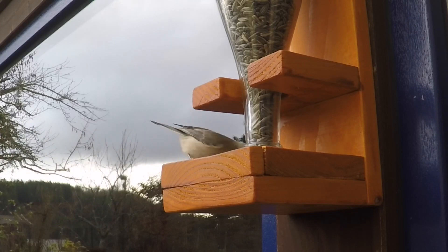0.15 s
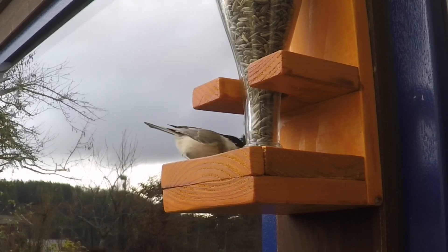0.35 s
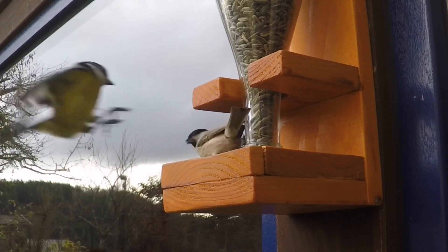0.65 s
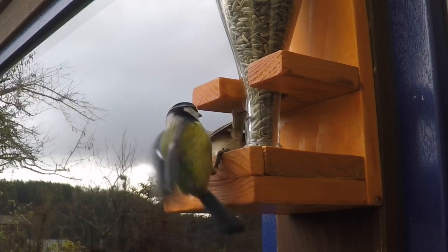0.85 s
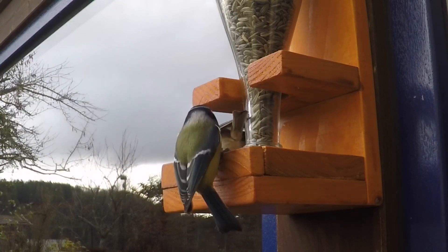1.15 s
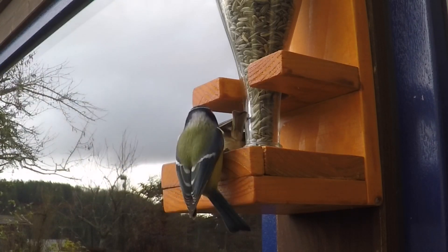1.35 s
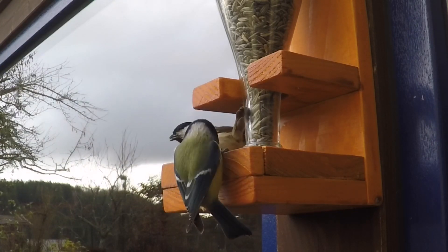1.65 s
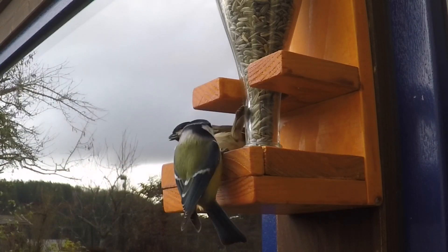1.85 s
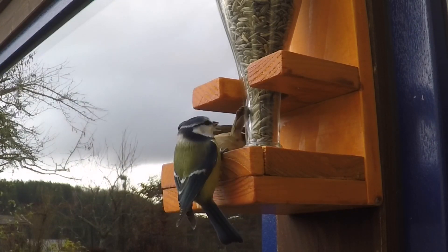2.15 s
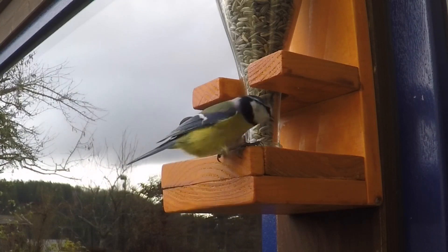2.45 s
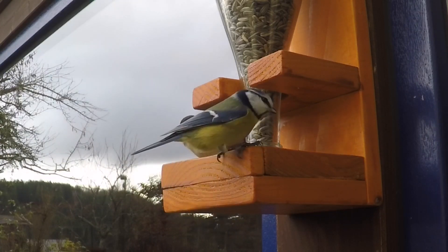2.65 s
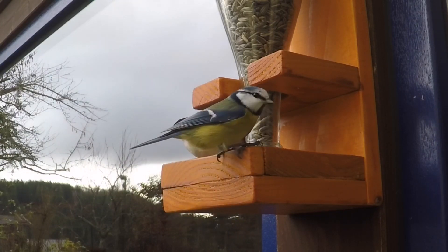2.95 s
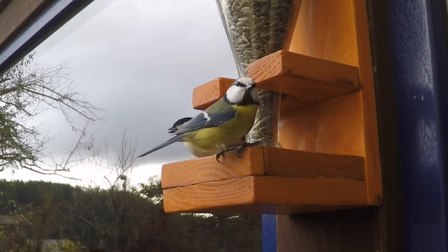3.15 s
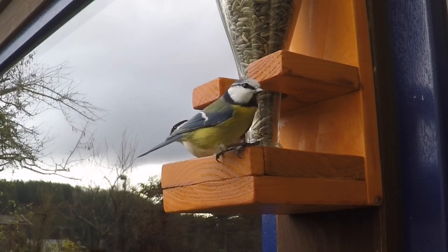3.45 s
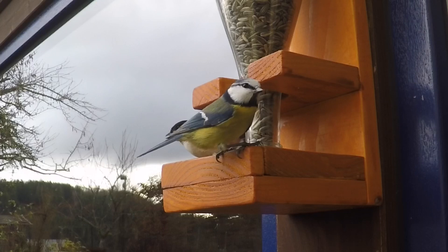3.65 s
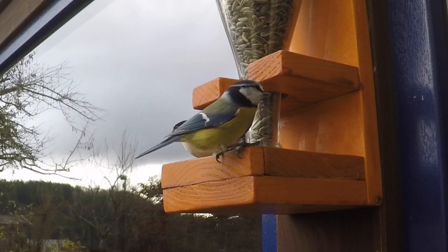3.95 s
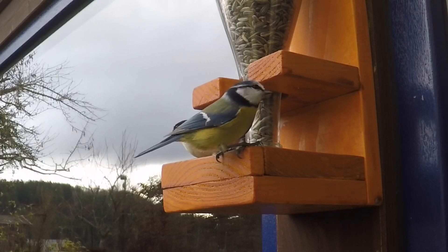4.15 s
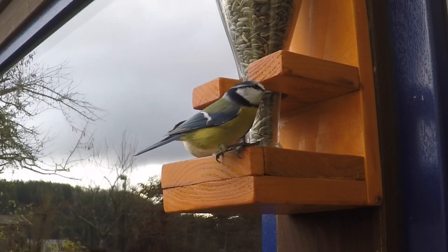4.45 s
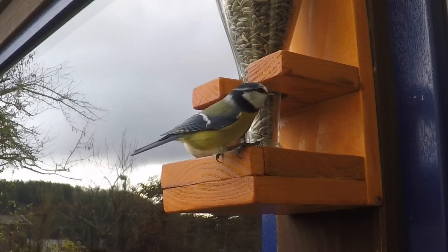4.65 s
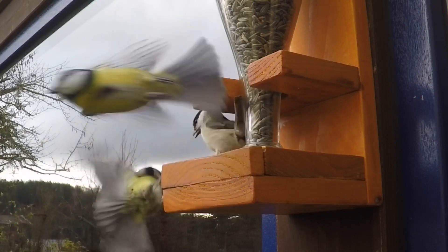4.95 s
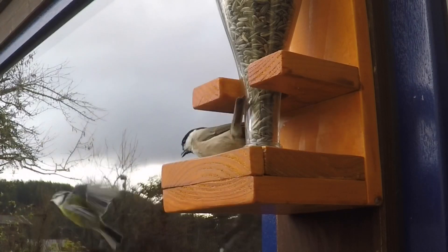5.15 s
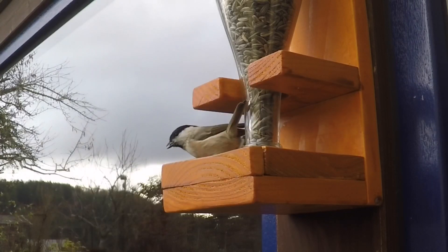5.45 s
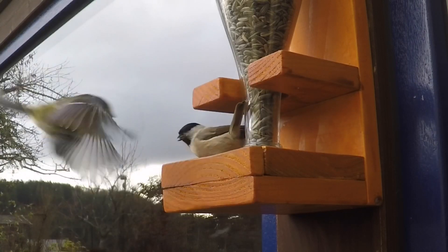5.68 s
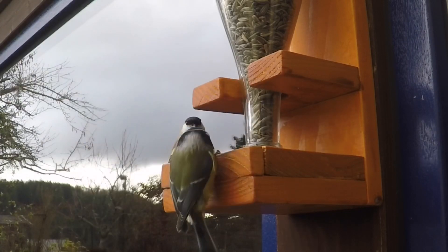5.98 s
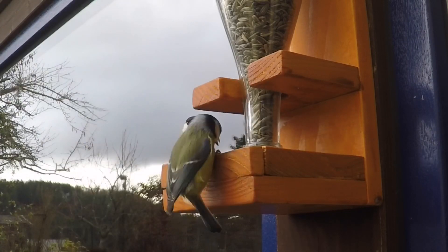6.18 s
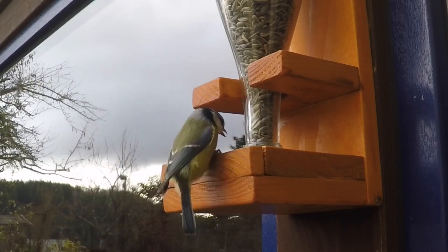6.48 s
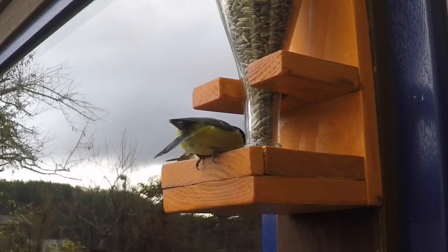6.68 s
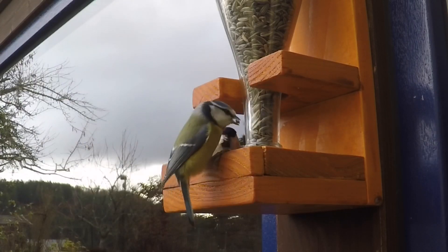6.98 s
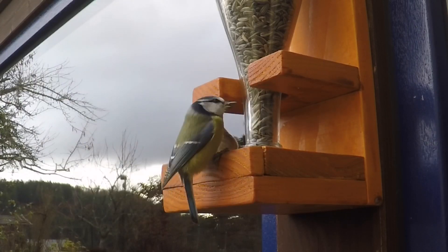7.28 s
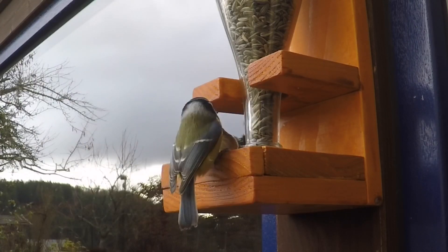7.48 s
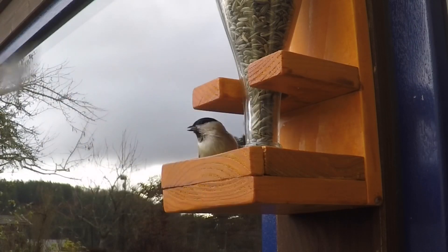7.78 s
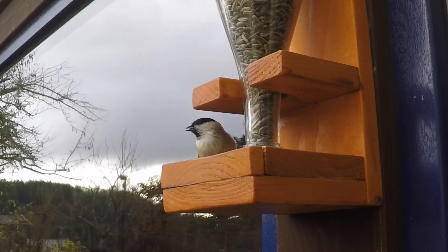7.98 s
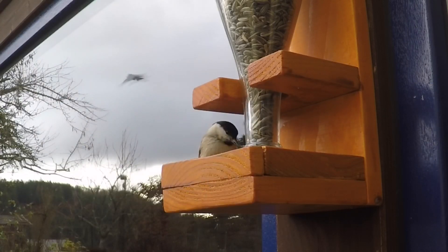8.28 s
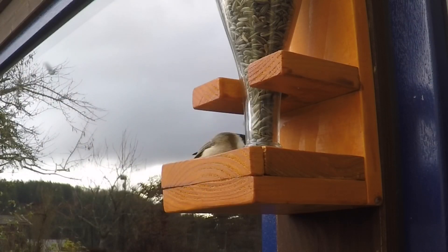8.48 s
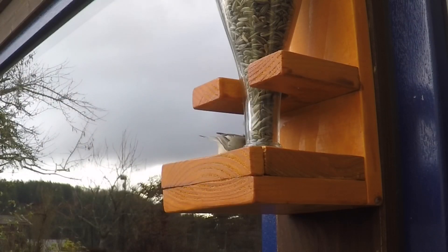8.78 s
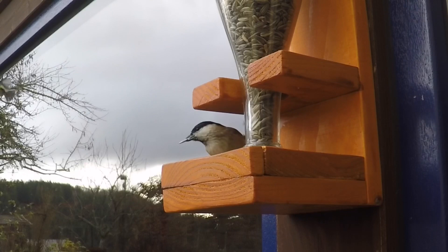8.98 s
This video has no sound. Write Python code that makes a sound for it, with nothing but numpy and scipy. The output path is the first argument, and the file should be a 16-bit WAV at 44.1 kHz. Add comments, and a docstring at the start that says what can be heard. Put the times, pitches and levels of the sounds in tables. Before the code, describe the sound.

Tiny birds bicker beside the microphone at a window feeder. Their very high, clipped notes arrive in three main clusters, each including a whistle and a rapid chip sliding into a rough warble, with light echoes from wall and wood. Between them are tiny ticks, claws and beaks scraping husks, and soft low wing flutters. Birds whirr past twice. A steady, quiet outdoor rush, low rumble and thin hiss remain after the calls stop.

```python
"""At a wooden window feeder, tits squabble in thin whistles, sharp ticks and quick down-swept chatter.
Each note is a frequency-modulated tone with weak overtones, heard directly and by reflection from wall and feeder.
Shaped noise bursts give the whirring wings and the claws and beaks that scratch among the seeds.
Steady coloured noise gives a distant outdoor rush and faint hiss; low noise puffs are air on the microphone."""
import sys
import numpy as np
from scipy import signal
from scipy.fft import rfft, irfft, next_fast_len
from scipy.io import wavfile
from scipy.ndimage import uniform_filter1d

SR = 44100
rng = np.random.default_rng(int(sys.argv[2]) if len(sys.argv) > 2 else 0)


def to_wav(s):
    """Save 16-bit WAV."""
    ch = np.atleast_2d(s).T  # columns
    pcm = np.round(np.clip(ch, -1, 1) * 32767)  # PCM
    wavfile.write(sys.argv[1], SR, pcm.astype(np.int16))


N = 402191  # length in samples
TOP_HZ = 15200  # band limit of the notes and of the whole mix


def amp(db):
    """Level to amplitude: 20 dB is a factor of ten."""
    return 10 ** (np.asarray(db) / 20)


def unit(x):
    """Normalisation: scale to rms 1."""
    return x / np.sqrt(np.mean(x ** 2) + 1e-20)


def along(points, hz):
    """Logarithmic frequency scale: interpolate (f/Hz, value) points along it."""
    f, values = np.transpose(points)
    return np.interp(np.log(hz + 1), np.log(f + 1), values)


def filtered(x, response):
    """Linear filtering: multiply the spectrum of x by a function of frequency."""
    n = x.shape[-1]
    padded = next_fast_len(n + 8192)
    spectrum = rfft(x, padded) * response(np.fft.rfftfreq(padded, 1 / SR))
    return irfft(spectrum, padded)[..., :n]


def panned(x, balance):
    """Interchannel level difference: half raises the left, half lowers the right, by frequency."""
    return filtered(x, lambda hz: amp(np.outer([.5, -.5], along(balance, hz))))


def add(track, s, sound):
    """Superposition: sum a sound into the track from time s, in seconds."""
    start = max(round(s * SR), 0)
    part = track[..., start:start + sound.shape[-1]]
    part += sound[..., :part.shape[-1]]


def wobble(count, size):
    """Random modulation: a moving average of noise over size samples, with rms 1."""
    return unit(uniform_filter1d(rng.standard_normal(count), size=size))


def spread(pair, spectrum, width):
    """Mid-side stereo: two signals are coloured, then summed into left and differenced into right."""
    def colour(hz):
        side_gain = amp(along(width, hz))
        shares = np.array([np.ones_like(hz), side_gain]) / np.hypot(1, side_gain)
        return amp(along(spectrum, hz)) * shares
    mid, side = filtered(pair, colour)
    return np.array([mid + side, mid - side])


# Stereo width of all noise: f/Hz, side-to-mid level/dB
NOISE_WIDTH = [(60, 0.5), (110, -9.5), (200, 2.5), (380, 1), (700, 8), (1290, 5), (2380, 1.5), (4400, -5.5),
               (8120, 1.5), (15000, 0)]
# Stereo balance of all noise: f/Hz, left-to-right level/dB
NOISE_BALANCE = [(50, -5.5), (150, -2), (280, 0), (800, 0), (6800, 0), (7800, -7), (9000, -3.5),
                 (11000, -0.5)]


def noise(spectrum, drive=1):
    """Shaped noise: white noise is modulated by drive, then coloured; the mid has rms 1 at drive 1."""
    hz = np.linspace(0, SR / 2, 8192)
    mid_share = 1 / (1 + amp(along(NOISE_WIDTH, hz)) ** 2)
    mid_power = np.mean(amp(along(spectrum, hz)) ** 2 * mid_share)
    source = drive * rng.standard_normal((2, N))
    stereo = spread(source, spectrum, NOISE_WIDTH)
    return panned(stereo, NOISE_BALANCE) / np.sqrt(mid_power)


def swells(events, rise, lead=0):
    """Transient envelope: each (t/s, level/dB) event starts lead early, peaks after rise, then decays."""
    envelope = np.zeros(N)
    u = np.arange(SR // 4) / SR / rise
    for s, db in events:
        add(envelope, s - lead, amp(db) * u ** 2 * np.exp(2 * (1 - u)))
    return envelope


# Spectra of the distant rumble and rush: f/Hz, relative level per Hz/dB
RUMBLE_SPECTRUM = [(90, -44.5), (112, -40), (135, -3), (160, 1.5), (235, 0), (320, -11), (450, -11.5),
                   (800, -41)]
RUSH_SPECTRUM = [(120, -41.5), (300, -0.5), (480, -1.5), (850, -1.5), (1200, -5), (2000, -13.5),
                 (3500, -20.5), (7000, -35)]
RUMBLE_DB, RUSH_DB = -54, -56
RUMBLE_DRIFT_DB = 1.24  # rms wander of the rumble level


def distance():
    """Broadband noise with slow amplitude modulation: a wandering low rumble under a steady rush."""
    rumble_level = amp(RUMBLE_DB + RUMBLE_DRIFT_DB * wobble(N, size=12000))
    return rumble_level * noise(RUMBLE_SPECTRUM) + amp(RUSH_DB) * noise(RUSH_SPECTRUM)


# Spectrum of the microphone's hiss: f/Hz, relative level per Hz/dB
HISS_SPECTRUM = [(1500, -12.5), (4500, -6), (6000, 0.5), (6900, 1.5), (7700, 6), (8300, 1.5), (10000, -0.5),
                 (12500, -9), (15000, -50)]
HISS_DB = -63.5


def hiss():
    """Stationary noise: the microphone's steady hiss has a fixed spectrum and level."""
    return amp(HISS_DB) * noise(HISS_SPECTRUM)


# Spectrum of air on the microphone: f/Hz, relative level per Hz/dB
BUFFET_SPECTRUM = [(15, 2), (40, 5), (80, -0.5), (130, -4.5), (300, -41)]
# Puffs of air: t/s at full strength, hold/s, level/dB before the eddies
PUFFS = [(2.8, .05, -73.5), (5.198, 0.49, -60.5)]
PUFF_RISE_DB_PER_S, PUFF_FALL_DB_PER_S = 33, 9.5
STILL_AIR_DB, EDDY_DB = -81.5, 2.5  # air between puffs; rms depth of the eddies


def puff():
    """Turbulent buffeting: powers of still air and puffs add, and eddies modulate the low noise."""
    t = np.arange(N) / SR
    power = amp(STILL_AIR_DB) ** 2
    for s, hold, db in PUFFS:
        rise_db = PUFF_RISE_DB_PER_S * np.maximum(s - t, 0)
        fall_db = PUFF_FALL_DB_PER_S * np.maximum(t - s - hold, 0)
        power = power + amp(db - rise_db - fall_db) ** 2
    eddies = amp(EDDY_DB * wobble(N, size=5000))
    return np.sqrt(power) * eddies * noise(BUFFET_SPECTRUM)


def background():
    """Superposition of independent noises: distant sound, air on the microphone and hiss."""
    return distance() + puff() + hiss()


RUMMAGE_FROM_S, RUMMAGE_TO_S = 0.081, 0.98  # while a bird feeds
RUMMAGE_DB = -47.5  # on the scale of the scratch table


def rummaging(count):
    """Stratified random timing: one faint scratch falls in each equal share of the span."""
    share = (np.arange(count) + rng.random(count)) / count
    times = RUMMAGE_FROM_S + share * (RUMMAGE_TO_S - RUMMAGE_FROM_S)
    return [(s, RUMMAGE_DB) for s in times]


# Claws and beaks among the seeds: t/s, relative level/dB
SCRATCHES = [(0.4354, -39), (0.4868, -46), (0.6155, -42.5), (0.6444, -40), (0.749, -42), (5.726, -32.5),
             (5.7735, -37.5), (7.415, -45)]
# A beak knocks on a seed: t/s, relative level/dB
PECKS = [(2.3013, -44)]
# Spectra of scratched husks and of the struck seed: f/Hz, relative level per Hz/dB
HUSK_SPECTRUM = [(1200, -11), (2400, -7), (3400, -2.5), (4300, -7), (6000, -11), (12000, -28)]
SEED_SPECTRUM = [(1500, -35), (2950, -21), (3300, -6), (3650, -18), (7000, -39)]


def seeds(grain_db=5):
    """Friction and impact: grainy noise bursts scratch husks and wood; a narrower band is the knock."""
    grain = unit(amp(grain_db * wobble(N, size=80)))
    scrape = swells(SCRATCHES + rummaging(count=9), rise=0.0074, lead=0.0051)
    knock = swells(PECKS, rise=0.0052, lead=0.0033)
    scratches = amp(-11.5) * noise(HUSK_SPECTRUM, grain * scrape)
    return scratches + amp(-7.5) * noise(SEED_SPECTRUM, knock)


# Bouts of wing beats: t/s, length/s, relative level of the first beat/dB
FLUTTERS = [(0.145, .08, -34), (0.481, .03, -39.5), (2.765, .13, -42.5), (2.982, .03, -41),
            (3.889, .03, -36.5), (4.868, .24, -37), (5.195, .03, -35), (5.408, .03, -39),
            (5.774, .09, -41.5), (7.355, .03, -42), (7.61, .13, -40.5)]
# A bird flies past the microphone: t/s when nearest, level/dB
FLIGHTS = [(4.94, -47.5), (7.72, -52.5)]
# Spectra of the beats and of air through feathers: f/Hz, relative level per Hz/dB
WING_SPECTRUM = [(85, -45), (115, -28), (145, 6), (190, 2), (260, -4), (380, -14), (700, -21),
                 (1800, -25.5), (4000, -42)]
WHIRR_SPECTRUM = [(100, -33), (140, -3), (240, 2), (380, -5), (700, -15), (1300, -18), (4000, -45)]
WINGBEAT_HZ, TIRING_DB_PER_S = 19, 14  # beat rate; fall in level along a bout
PASS_S = 0.19  # time from nearest to half amplitude
DRAUGHT_DB = -39  # air that a beat pushes onto the microphone, relative to the beat envelope


def wings():
    """Aerodynamic noise: beats pulse low noise in bouts, and a passing bird swells a steady whirr."""
    beats = []
    for s, length, db in FLUTTERS:
        for late in np.arange(0, length, 1 / WINGBEAT_HZ):
            beats.append((s + late, db - TIRING_DB_PER_S * late))
    push = swells(beats, rise=0.019, lead=0.01)
    t = np.arange(N) / SR
    whirr = sum(amp(db) / (1 + ((t - s) / PASS_S) ** 2) for s, db in FLIGHTS)
    flaps = amp(-5.5) * noise(WING_SPECTRUM, push)
    draught = amp(DRAUGHT_DB) * noise(BUFFET_SPECTRUM, push)
    return flaps + noise(WHIRR_SPECTRUM, whirr) + draught


# Early wall echoes: delay t/ms, left level/dB, right level/dB
WALLS = [(5.684, -19, -18), (11.44, -20, -19), (20.84, -37, -42), (28.6, -28, -35)]
# Colour of the late garden echoes: f/Hz, level/dB
GARDEN_TONE = [(1900, 0), (3500, 3.5), (4700, 0), (6000, -3.5), (7500, -2)]
# Colour of all scattered echoes: f/Hz, level/dB
ECHO_TONE = [(1900, 8), (3000, -3), (4300, -4), (5600, 6.5), (7000, 5), (8500, 13)]
# Stereo width of the scattered echoes: f/Hz, side-to-mid level/dB
ECHO_WIDTH = [(1900, -1.5), (3000, -5.5), (4300, -5.5), (5600, 1), (7500, 2)]


def surroundings(near_db, near_t60, far_db, far_t60, build, clump_db):
    """Impulse response: wall echoes, dense scatter under the eaves and uneven late garden returns."""
    t = np.arange(int(.7 * SR)) / SR

    def tail(db, t60, lumps=1):
        """Exponential decay: noise builds up, then falls 60 dB in t60 seconds."""
        decay = lumps * amp(-60 * t / t60) * (1 - np.exp(-(t / build) ** 2))
        return amp(db) * rng.standard_normal((2, len(t))) * decay / np.linalg.norm(decay)

    garden = tail(far_db, far_t60, amp(clump_db * wobble(len(t), size=500)))
    garden = filtered(garden, lambda hz: amp(along(GARDEN_TONE, hz)))
    echo = spread(tail(near_db, near_t60) + garden, ECHO_TONE, ECHO_WIDTH)
    for ms, *sides_db in WALLS:
        for side, db in zip(echo, sides_db):
            add(side, ms / 1000, amp([db]))
    return echo


# Overtones of the syrinx: multiple of the contour frequency, mean level/dB before the throat
OVERTONES = [(2, -20.5), (3, -30)]
# Passband of the throat: f/Hz, level/dB
THROAT = [(1300, -11.5), (2000, -21), (2700, -3), (3300, 1), (4500, 2), (6000, -4), (7500, -8), (9200, -15),
          (14000, -40)]


def note(shape, pitch, length, swell_db, depth, jitter, flutter_db):
    """Source and filter: a gliding tone and unsteady overtones, weighted by the throat's passband."""
    ms, hz, effort_db = np.transpose(shape)
    knots = np.maximum.accumulate(ms) * length / 1000
    t = np.arange(SR // 8) / SR
    # depth stretches the sweep about its median frequency
    contour = pitch * hz * (hz / np.median(hz)) ** (depth - 1)
    glide = uniform_filter1d(np.interp(t, knots, contour), size=70)
    f0 = glide * (1 + jitter * wobble(len(t), size=40))
    phase = 2 * np.pi * np.cumsum(f0) / SR

    onset = np.minimum(t / 0.00056, 1)
    gate = uniform_filter1d(1. * (t < knots[-1]), size=40) * onset
    swell = swell_db * (np.minimum(t / knots[-1], 1) - .5)
    effort = gate * amp(np.interp(t, knots, effort_db) + swell)

    def partial(k):
        """Resonance: the throat sets the level of the partial at k times the contour."""
        audible = k * f0 < TOP_HZ
        return amp(along(THROAT, k * f0)) * audible * np.sin(k * phase)

    overtones = 0
    for k, db in OVERTONES:
        flutter = flutter_db * wobble(len(t), size=200)
        overtones = overtones + amp(db + flutter) * partial(round(k))
    # the fundamental lies 1 % below the contour, so the overtones are slightly sharp of it
    return effort * (partial(0.99) + overtones)


# Note contours: t/ms, f/Hz, effort level/dB, all before the delivery of each utterance
WHISTLE = [(0, 6840, -14.5), (4, 6900, -3.5), (12.8, 6910, 2), (17.7, 7030, -1), (27.1, 7290, -4.5),
           (36.6, 7620, -4), (44.4, 8020, -18), (54.2, 7800, -13)]
TICK = [(0, 5600, -18), (3, 5600, -3.5), (6, 5450, -2.5), (9, 4750, -2.5), (11.5, 4240, -1), (13, 5300, -6),
        (14.5, 6240, 5), (16.5, 8000, 0), (19.5, 9000, -20)]
SLUR = [(0, 6150, -9), (6, 5750, -7), (10.9, 5450, -11), (15.5, 4450, -7), (18.4, 4400, -12),
        (21.2, 6100, -3.5), (24.8, 6960, 7), (28, 7050, -7), (30, 7000, -22)]
DROP = [(0, 8600, -15), (2, 7830, -2.5), (4, 7200, 2), (9.04, 6900, -0.5), (13.7, 6700, -6), (19, 6800, -2),
        (22, 6260, -18)]
HOOK = [(0, 5900, -21), (2, 6850, -4.5), (5, 7700, -22), (10, 8730, -14), (15, 7600, 2), (22, 6900, -5),
        (24.8, 7000, 2.5), (28, 7300, -18)]
CHIP = [(0, 8200, -14), (3.1, 5800, -8), (6.4, 4500, -3.5), (10.1, 4150, -2), (15.8, 3930, -4.5),
        (18.7, 4200, 0.5), (23.18, 2600, -7), (29.6, 1400, -1)]
WARBLE = [(0, 1450, -8.5), (10.62, 3500, -2.5), (27.08, 2690, -3.5), (32.25, 2130, -5.5), (44.4, 1910, 0.5),
          (54.8, 2130, -3), (60.2, 3800, -0.4), (66.5, 4620, -4.5), (76.3, 4250, -8)]
# Utterances: t/s, relative level/dB, pitch ratio, length ratio, start-to-end swell/dB, sweep depth (exponent)
WHISTLES = [(1.462, -9, 1.001, 1.08, 2.5, 0.86), (4.58, -20.5, 1.024, 1.01, 13, 0.75),
            (4.861, -12, 1.004, 1.25, 5, 0.9), (5.737, -14.5, 1.012, 0.9, -9, 1.25),
            (6.052, -15, 1.011, 0.98, 4, 1), (7.520, -15.5, 1.015, .92, -8, 0.88)]
TICKS = [(1.285, -24.5, 1, 1.05, 18.5, 0.95), (2.1125, -24.5, 1.005, 0.94, -1, 0.95),
         (2.51, -24, 0.93, 0.82, -6, 0.76), (5.6278, -22.5, 1.013, 1, -10, 1.08),
         (6.5806, -24.5, 1.004, 1.06, -8, 1.38)]
SLURS = [(0.904, -18, 1, 0.99, 0, 1)]
DROPS = [(.592, -16, 1.01, 1, 0, 0.89)]
HOOKS = [(1.373, -15, 1.005, 0.99, 0, .95)]
CHIPS = [(1.555, -20.5, 1.025, 1.04, -9.5, 1), (4.6803, -24.5, 1.034, 1.01, 3, 0.93),
         (5.86, -18, 1, 1, 0, 0.96), (7.6262, -19, 0.97, 1.05, -6, 0.91)]
WARBLES = [(1.6114, -23.5, 1.01, .96, 0, 1.1), (4.7354, -19, 1.05, 1.06, 1, 1.05),
           (5.918, -17.5, 1.01, 1, 0, .99), (7.6817, -20.5, 0.99, 0.97, 0, 0.99)]
# Balance of the microphone's two ports toward the birds: f/Hz, left-to-right level/dB
PORTS = [(1300, 5), (2000, 9.5), (2900, -4), (4000, 1), (5000, 2.5), (5700, 3.5), (6900, 11.5), (7600, 6),
         (8500, -14)]


def birds():
    """Direct and reflected sound: each note reaches both ports, then is convolved with its echoes."""
    out = np.zeros((2, N))
    repertoire = [(WHISTLE, WHISTLES), (TICK, TICKS), (SLUR, SLURS), (DROP, DROPS),
                  (HOOK, HOOKS), (CHIP, CHIPS), (WARBLE, WARBLES)]
    for shape, utterances in repertoire:
        for s, db, *delivery in utterances:
            voice = amp(db) * note(shape, *delivery, jitter=0.0038, flutter_db=2.5)
            echo = surroundings(near_db=-10, near_t60=0.16, far_db=-14, far_t60=0.54,
                                build=0.0011, clump_db=4.5)
            add(out, s, amp(-1) * panned(voice, PORTS))
            add(out, s, signal.fftconvolve(voice[None], echo, axes=1))
    return out


def scene():
    """Superposition: background, seeds and wings lie under the birds at the feeder."""
    return background() + seeds() + wings() + birds()


def record(dry):
    """Band limitation: nothing passes at or above the top frequency."""
    return filtered(dry, lambda hz: hz < TOP_HZ)


dry = scene()
out = record(dry)
to_wav(out)
```